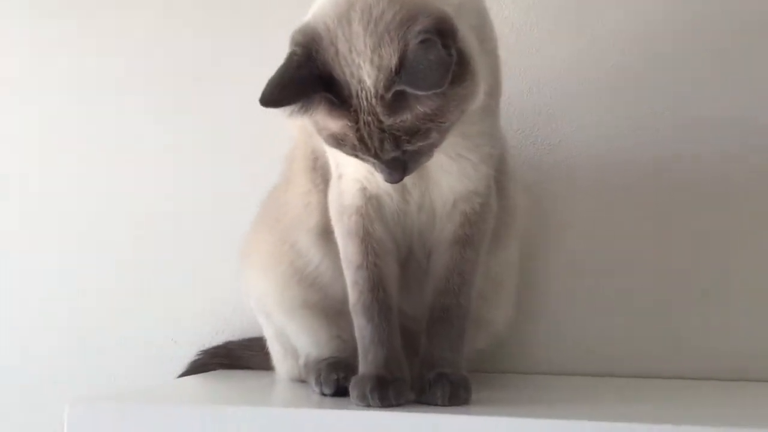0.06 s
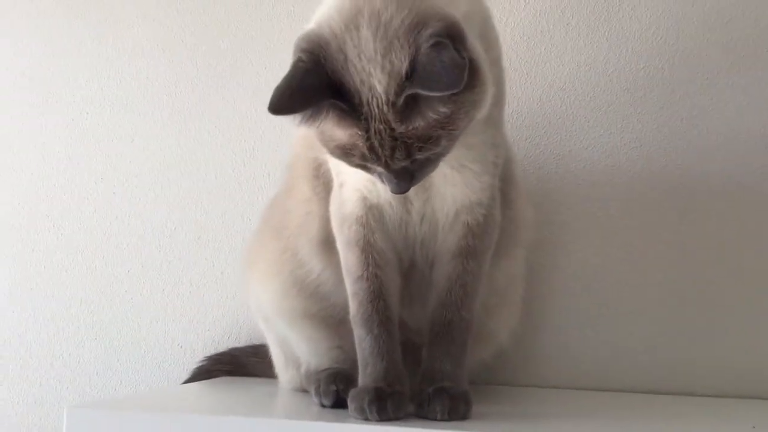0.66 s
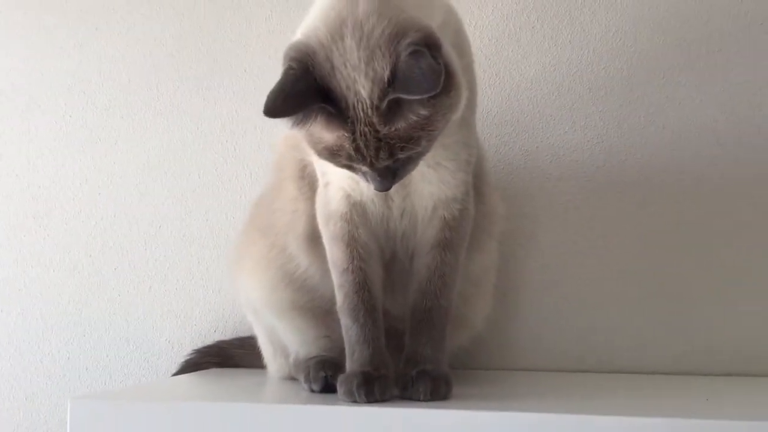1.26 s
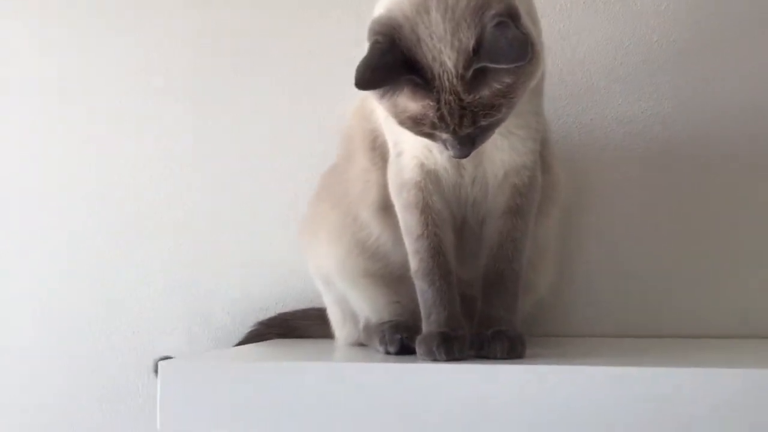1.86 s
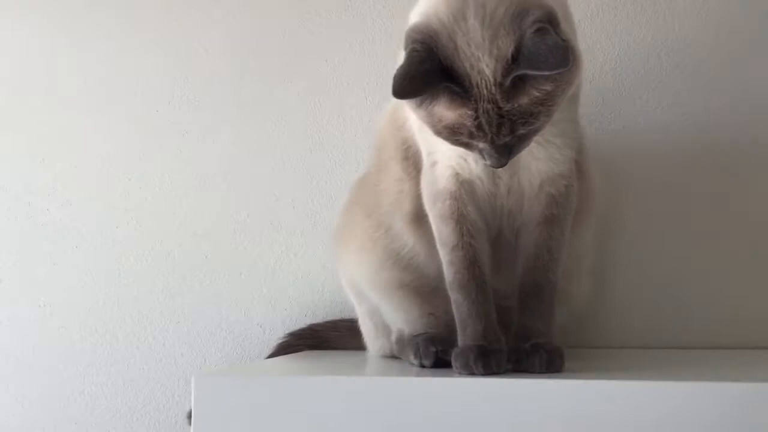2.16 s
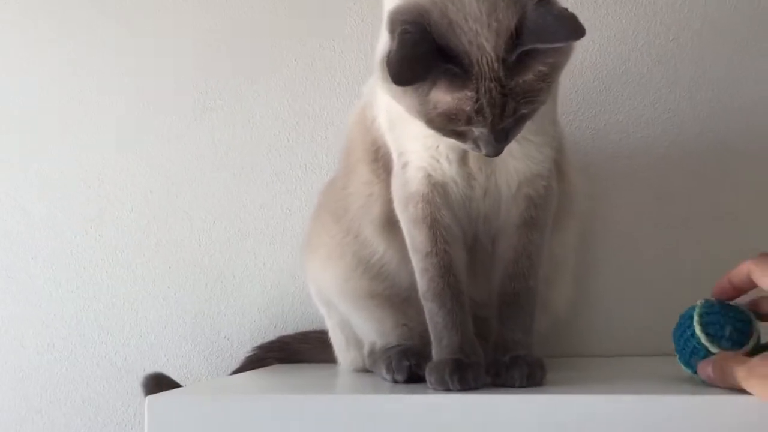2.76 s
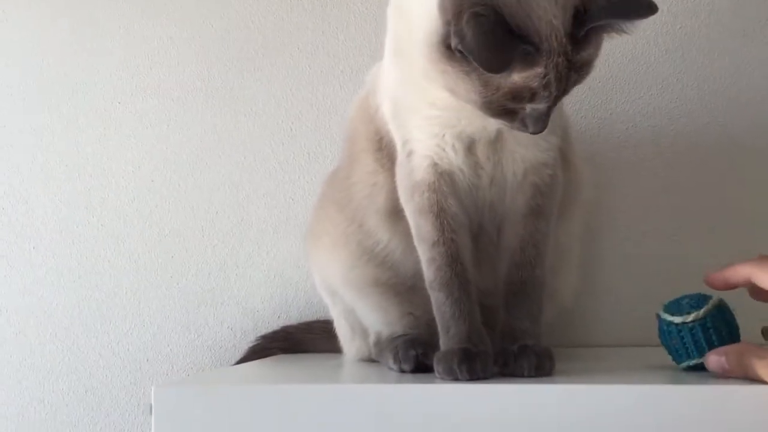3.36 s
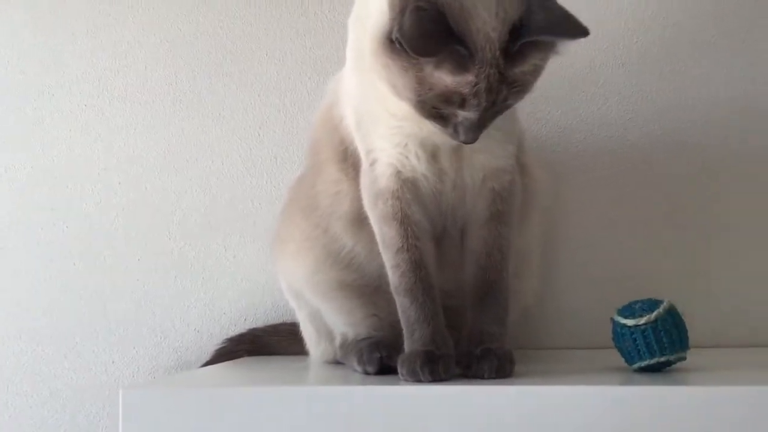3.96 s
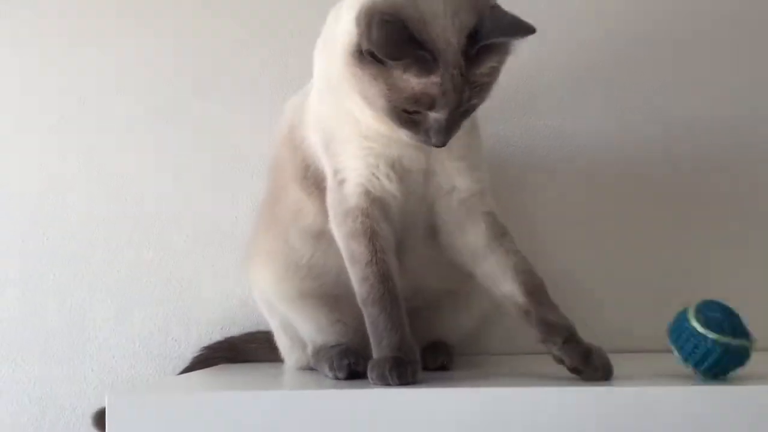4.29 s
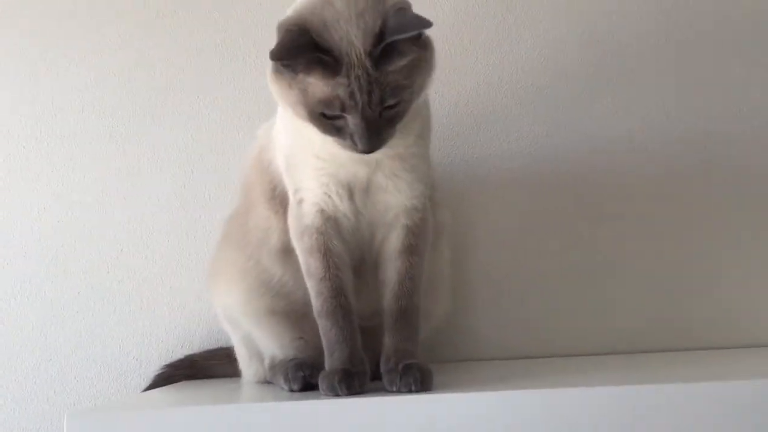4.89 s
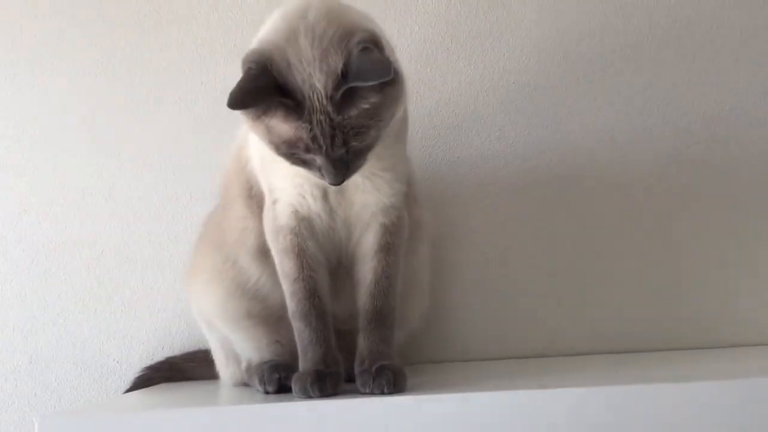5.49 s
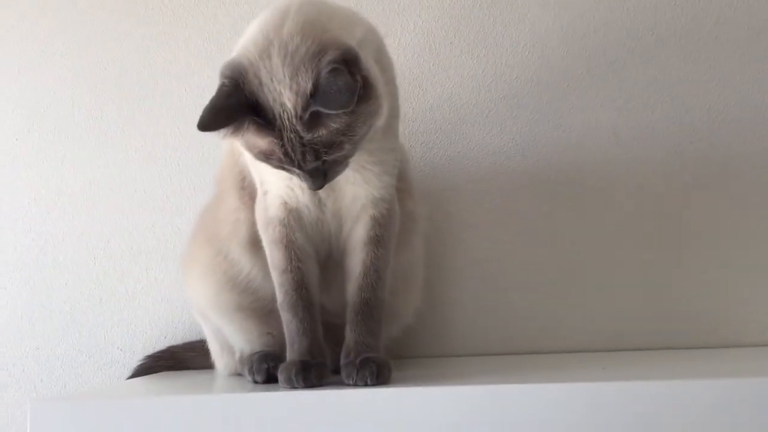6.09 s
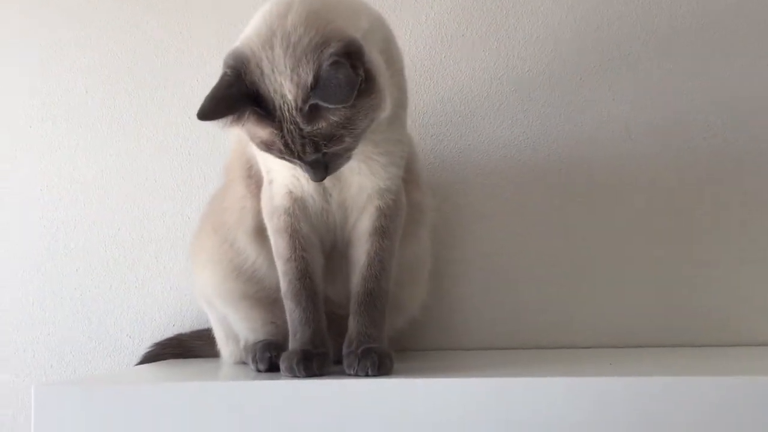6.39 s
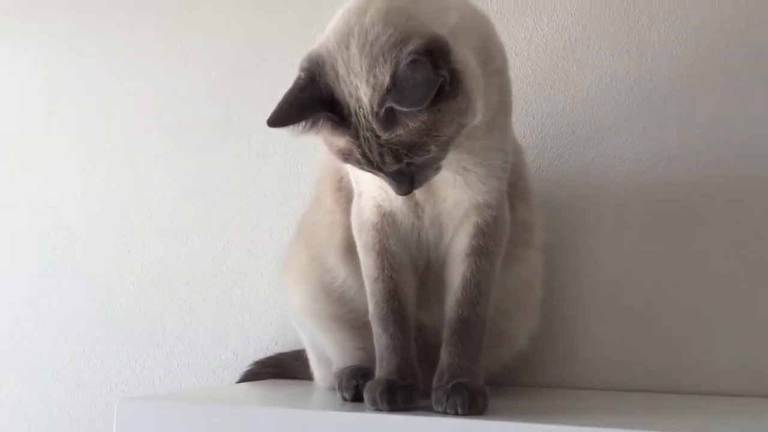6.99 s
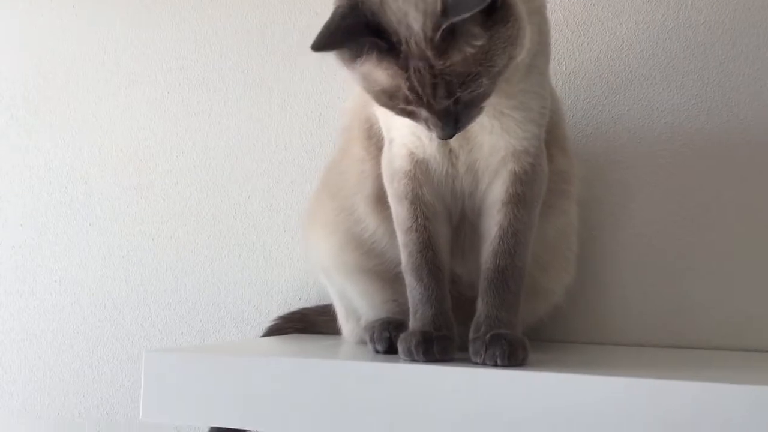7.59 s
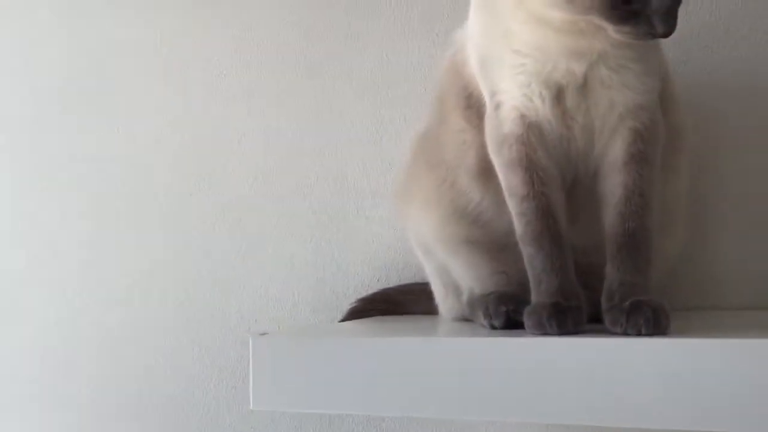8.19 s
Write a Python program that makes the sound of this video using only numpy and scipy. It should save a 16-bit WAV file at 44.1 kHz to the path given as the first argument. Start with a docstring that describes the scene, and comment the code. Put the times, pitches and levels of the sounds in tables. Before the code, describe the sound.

A plastic toy clacks and jingles in a bare room; later a ball is brushed off a shelf, bounces and knocks against furniture.

```python
"""A hollow plastic toy clatters in a bare room and rolls away, a pellet jingling the steel bell inside it.
A tiny bell tinkles faintly and small handling ticks sound close by. A cat's paw sweeps a yarn-covered
ball off a shelf, its fibres crackling. The ball slaps the hard floor, bounces in dull thuds, knocks against
furniture with a dry rattle and rolls out. The building murmurs underneath."""
import sys
import numpy as np
from scipy import signal
from scipy.fft import rfft, irfft, next_fast_len
from scipy.io import wavfile

SR = 44100
rng = np.random.default_rng(int(sys.argv[2]) if len(sys.argv) > 2 else 0)


def int16_out(signal):
    """Quantize to a 16-bit WAV file."""
    q = np.round(np.clip(np.atleast_2d(signal).T, -1, 1) * 32767)
    wavfile.write(sys.argv[1], SR, q.astype(np.int16))


N = 363825
CLOCK = np.arange(N) / SR  # time in the scene [s]
T = np.arange(SR) / SR  # time after a hit [s]
TOY_START_S, TOY_STOP_S, TOY_RISE_S = 0.2, 1.15, 0.058  # the roll of the toy and its bell

# crisp colour of yarn, ticks and tinkle attacks: (frequency [Hz], level [dB])
CRISP_COLOUR = [(500, -30), (1700, -17), (2400, -6.5), (4800, -5.5), (7500, 5), (10000, -0.5), (15000, -7)]


def plastic_toy():
    """The hollow shell gives short, hard clacks, thumps onto its side and trundles away."""
    # hits on the shell: (time [s], level [dB])
    clacks = [(0.1255, -18.5), (0.2145, -12), (0.22, -26)]
    # shell modes: (frequency [Hz], level [dB], t60 [s])
    shell_modes = [(993.5, -8, 0.084), (1220, -3.5, 0.075), (1376, 0.5, 0.067), (1470, -2, 0.017),
                   (1691.5, -0.5, .08), (1966, -3.5, 0.11), (2180, -8.5, .1), (2343, -11, 0.11)]
    # drops onto its side: (time [s], level [dB])
    thumps = [(0.166, -23), (0.278, -42.5)]
    # colours of the clack, the thump and the rolling shell: (frequency [Hz], level [dB])
    clack_colour = [(200, -32), (850, -15), (1300, -1.5), (2150, 0.5), (2750, -26.5), (6000, -37),
                    (15000, -49)]
    thump_colour = [(70, -37.5), (120, -15), (175, 1), (270, -4), (500, -4.5), (1000, -7), (3000, -17.5),
                    (8000, -31.5)]
    trundle_colour = [(90, -30), (240, -10.5), (355, -1), (450, -13), (620, -5.5), (1000, -10.5),
                      (1900, -12), (2800, -29.5), (6000, -44)]
    out = np.zeros(N)
    for s, db in clacks:
        shell = amp(-2) * ring(shell_modes, vary_db=1, blur_hz=30)
        contact = amp(5) * burst(clack_colour, t60=0.03)
        add(out, s, amp(db) * in_room(shell + contact, wet_db=-4.5))
    for s, db in thumps:
        thump = burst(thump_colour, t60=0.13, rise=0.0016)
        add(out, s, amp(db) * in_room(thump, wet_db=-6))
    out = low_cut(out, hz=130, order=3)  # the small shell radiates little bass
    speed = rolling_speed(TOY_START_S, TOY_STOP_S, TOY_RISE_S)
    return out + amp(-46) * speed * coloured(grains(N, spread_db=3.5), trundle_colour)


def jingle_bell():
    """A loose pellet strikes the slotted steel shell; its rolling keeps the ring going and roughens it."""
    # pellet hits: (time [s], level [dB], trim of the lowest mode [dB])
    jingles = [(0.0, -46.5, 6), (0.1256, -26, -16), (0.143, -24, -11), (0.165, -24, -18),
               (0.183, -21.5, 3.5), (0.2, -29, 13), (0.2264, -23, 6.5), (0.2624, -27, 13.5),
               (0.3961, -34.5, -9), (0.4863, -32.5, 0), (0.512, -36, 9), (0.6109, -37.5, 13.5),
               (0.7637, -33.5, -17.5), (0.808, -39.5, -3), (0.9353, -44, -7), (1.0219, -49.5, -19),
               (1.341, -63, 4.5), (1.712, -62, 3)]
    # bell modes: (frequency [Hz], level [dB], t60 [s])
    bell_modes = [(4995, -1, 0.16), (5610, 1.5, .58), (6005, -5.5, 0.8), (6580, -14, 0.94),
                  (7250, -14.5, 0.3802), (7790, -11, .9), (9060, -14, .4), (11230, -4, 0.08),
                  (11580, -16.5, .4), (12900, -14.5, 0.22), (14800, -12.5, .18)]
    # colour of the pellet on steel: (frequency [Hz], level [dB])
    steel_colour = [(800, -29), (3600, -13), (5200, 0), (6100, 5), (6850, -2.5), (7400, -0.5), (9200, -2),
                    (10200, -12), (11200, -0.5), (12000, -1.5), (15000, -3.5)]
    out = np.zeros(N)
    motion = amp(-41) * rolling_speed(TOY_START_S, TOY_STOP_S, TOY_RISE_S) ** 1.4
    damping = amp(-9.5) + amp(-2.5) * fade(0.045)  # the pellet lies on the shell and chokes most of the ring
    for s, db, low_db in jingles:
        lowest = amp(low_db - 4) * ring(bell_modes[:1], vary_db=0, blur_hz=30)
        upper = ring(bell_modes[1:], vary_db=1, blur_hz=22)
        click = amp(1.5) * burst(steel_colour, t60=0.022, rise=0.0002)
        add(out, s, amp(db) * in_room(damping * (lowest + upper) + click, wet_db=-9))
        add(motion, s, amp(db - 10.5) * fade(0.22))  # the pellet skitters on after each hit
    rolling = coloured(grains(N, spread_db=4), steel_colour)
    singing = unit(signal.fftconvolve(rolling, ring(bell_modes, vary_db=0, blur_hz=20))[:N])
    return out + in_room(motion * (amp(-0.5) * rolling + amp(-6) * singing), wet_db=-8)


def ball_bounces():
    """A hard landing slaps; softer ones mostly thud and set the floor booming."""
    # landings: (time [s], thud [dB], slap [dB], boom [dB])
    landings = [(5.0938, -13.5, -12.5, -19.5), (5.5127, -15, -25.5, -24.5), (5.673, -20, -34.5, -24.5),
                (5.811, -34, -69, -33.5), (5.913, -35, -72, -31)]
    # modes of the squashing ball, and of the floor and room: (frequency [Hz], level [dB], t60 [s])
    squash_modes = [(155, -1.5, 0.11), (325.2, -2.5, 0.065)]
    boom_modes = [(182.2, 2.5, 0.38), (80.75, -10.5, 0.45), (63, -11, .5)]
    # colours of the dull thud and the sharp slap: (frequency [Hz], level [dB])
    thud_colour = [(25, -35), (60, -10.5), (110, -2), (160, 2.5), (320, -1.5), (420, -14), (700, -21.5),
                   (1500, -45), (4000, -80)]
    slap_colour = [(80, -28), (280, 0.5), (550, 4), (1000, -4), (1450, -7), (2200, -9), (3000, -17.5),
                   (5500, -17), (9000, -22), (15000, -30)]
    out = np.zeros(N)
    for s, thud_db, slap_db, boom_db in landings:
        squash = amp(-1.5) * ring(squash_modes, vary_db=0, rise=0.002)
        thud = amp(thud_db) * (squash + amp(-3.5) * burst(thud_colour, t60=0.27, rise=0.0027))
        slap = amp(slap_db) * burst(slap_colour, t60=0.22, spread_db=1, rise=0.00087)
        boom = amp(boom_db) * ring(boom_modes, vary_db=1, rise=0.01)
        add(out, s, in_room(thud, wet_db=-6) + in_room(slap, wet_db=-4) + boom)
    return out


def furniture_bumps():
    """The ball knocks on wood, and its filling rattles."""
    # bumps: (time [s], knock [dB], rattle [dB])
    bumps = [(5.8134, -55, -47), (5.8286, -68, -44), (5.9134, -59, -47), (6.1429, -48, -45),
             (6.176, -59, -43), (6.296, -23.5, -29), (6.341, -30, -37), (6.4079, -43.5, -41),
             (6.514, -43, -39), (6.562, -44, -42), (6.743, -70.5, -54)]
    # furniture modes: (frequency [Hz], level [dB], t60 [s])
    wood_modes = [(261.7, 2, 0.22), (358.4, 2, 0.38), (442, -7, 0.1), (548, -20, .12), (656, 2, 0.039)]
    # colours of the woody knock and the dry rattle: (frequency [Hz], level [dB])
    knock_colour = [(50, -11), (150, 0), (350, 5.5), (520, -3), (700, -7), (1050, -16), (2000, -41),
                    (5000, -39)]
    rattle_colour = [(300, -43), (1500, -12.5), (3000, -9.5), (4500, -1.5), (7000, -1), (10500, -8),
                     (15000, -10.5)]
    out = np.zeros(N)
    for s, knock_db, rattle_db in bumps:
        wood = amp(-7.5) * ring(wood_modes, vary_db=1, rise=0.002, blur_hz=30)
        knock = amp(knock_db) * (wood + burst(knock_colour, t60=0.13))
        rattle = amp(rattle_db) * burst(rattle_colour, t60=0.16, spread_db=2)
        add(out, s, in_room(knock + rattle, wet_db=-4.5))
    return out


def handling_ticks():
    """Tiny contacts close by, each a very short, bright snap of noise."""
    # ticks: (time [s], relative level [dB])
    ticks = [(2.1442, -38), (2.273, -44.5), (2.311, -42), (2.3469, -41.5), (2.4364, -38), (3.349, -54),
             (3.378, -53), (4.3162, -31), (4.447, -35), (4.5178, -35.5), (4.582, -39), (4.6072, -37),
             (4.765, -45), (7.8455, -35.5)]
    out = np.zeros(N)
    for s, db in ticks:
        add(out, s, amp(db - 3) * burst(CRISP_COLOUR, t60=0.011, rise=0.0001))
    return out


def paw_sweep():
    """The paw brushes the ball along the shelf in one grainy swish."""
    # colour of the brushing: (frequency [Hz], level [dB])
    brush_colour = [(290, -67), (500, -36.5), (1040, -14.5), (1170, -9), (1700, -0.5), (2650, -3.5),
                    (2930, -1), (3190, -6), (3630, -6), (11300, -14.5), (15500, -23.5)]
    return amp(-45) * paw_push() * coloured(grains(N, spread_db=2.5), brush_colour)


def tiny_bell():
    """Faint, pure tinkles: two close modes beat against each other after a crisp attack."""
    # strikes: (time [s], level [dB])
    tinkles = [(1.675, -65.5), (1.712, -57.5), (1.756, -55), (1.80, -58.5), (2.0, -70), (2.74, -72),
               (2.834, -64), (4.0, -69.5), (4.132, -66)]
    # bell modes: (frequency [Hz], level [dB], t60 [s])
    bell_modes = [(7840, -6, 0.23), (7780, 2, 0.2), (15090, -27, .15)]
    out = np.zeros(N)
    for s, db in tinkles:
        tone = ring(bell_modes, vary_db=1, rise=0.002)
        add(out, s, amp(db) * (tone + amp(-6) * burst(CRISP_COLOUR, t60=0.05)))
    return in_room(out, wet_db=-10)


def furniture_taps():
    """Light taps on furniture, each with one short, blurred ring."""
    # taps: (time [s], level [dB], ring frequency [Hz])
    taps = [(0.06, -62, 2319), (2.345, -71, 2920), (4.765, -55.5, 2751), (7.283, -51.5, 1300),
            (7.333, -57, 1257), (7.395, -60, 1300)]
    # colour of the contact: (frequency [Hz], level [dB])
    tap_colour = [(120, -7), (300, 2), (520, -7.5), (850, -14.5), (1400, -2.5), (2000, -4), (3000, -1.5),
                  (4500, -5), (6000, -13.5), (14000, -30)]
    out = np.zeros(N)
    for s, db, hz in taps:
        body = amp(1.5) * ring([(hz, 0, 0.13)], vary_db=0, rise=0.0031, blur_hz=160)
        add(out, s, amp(db) * (burst(tap_colour, t60=0.1716, rise=0.003) + body))
    return out


def yarn_crackle():
    """Fibres snap under the paw, in each rustle and wherever the ball rolls."""
    # rustles from handling and scuffing: (centre time [s], level [dB], length [s])
    rustles = [(1.31, -72, 0.34), (2.148, -63.5, .08), (2.34, -63.5, 0.16), (3.285, -74, 0.31),
               (5.95, -49.5, 0.099), (7.414, -65.5, 0.071), (7.855, -56.5, 0.11)]
    floor_speed = rolling_speed(start=6.3, stop=7.78, rise=0.046)  # after the last hard knock
    motion = amp(-57) * paw_push() + amp(-61.5) * shelf_roll() + amp(-57.5) * floor_speed ** 2.07
    for s, db, length in rustles:
        motion += amp(db) * np.exp(-(2 * (CLOCK - s) / length) ** 2)
    crackle = unit(snaps(per_s=330, spread_db=7.5))
    hiss = amp(-2) * rng.standard_normal(N)
    return motion * coloured(crackle + hiss, CRISP_COLOUR)


def shelf_rumble():
    """The shelf board rumbles softly when nudged and under the rolling ball."""
    # nudges: (time [s], level [dB])
    nudges = [(1.69, -63.5), (2.475, -67.5)]
    # colour of the board: (frequency [Hz], level [dB])
    board_colour = [(40, -19.5), (105, 5), (180, -11.5), (350, -7), (600, -23), (1500, -39.5)]
    nudging = sum(amp(db) * stroke(s, attack=0.017, hold=0.031, t60=0.3) for s, db in nudges)
    return (nudging + amp(-63) * shelf_roll()) * coloured(rng.standard_normal(N), board_colour)


def room_tone():
    """The low, steady murmur of the building under a faint hiss."""
    # colour of the air: (frequency [Hz], level [dB])
    air_colour = [(12, -46.5), (20, -12.5), (44, -2.5), (101, -0.5), (126, -9), (266, -9), (519, -21),
                  (565, -17.5), (788, -20.5), (1200, -18.5), (2330, -24), (7310, -30), (7950, -28.5),
                  (15500, -39.5)]
    return amp(-68) * coloured(rng.standard_normal(N), air_colour)


def in_room(x, wet_db):
    """Add the reverb of the bare walls, with a fresh tail for every place."""
    # room decay: (frequency [Hz], t60 [s])
    decay_times = [(60, .7), (180, 0.68), (380, 0.76), (1000, .9), (2000, 1), (5000, 0.97), (9000, 0.72),
                   (15000, 0.38)]
    hz, t, noise = signal.stft(rng.standard_normal(SR), SR, nperseg=256)
    decaying = noise * fade(along(decay_times, hz)[:, None], t)
    tail = signal.istft(decaying, SR)[1][:SR] * onset(0.0032)
    return x + amp(wet_db) * signal.fftconvolve(x, tail / np.linalg.norm(tail))[:len(x)]


def paw_push():
    """How hard the paw presses on the ball, 0-1."""
    return stroke(start=4.21, attack=0.052, hold=0.075, t60=0.64)


def shelf_roll():
    """How strongly the ball rolls on the shelf, 0-1: even up to the edge, then dying away."""
    return stroke(start=4.41, attack=0.05, hold=0.16, t60=0.3)


def rolling_speed(start, stop, rise):
    """Speed, 0-1, of a thing that gets rolling and is evenly slowed by friction."""
    return np.clip((CLOCK - start) / rise, 0, 1) * np.clip((stop - CLOCK) / (stop - start), 0, 1)


def stroke(start, attack, hold, t60):
    """An envelope that swells, holds and dies away; times in seconds."""
    t = CLOCK - start
    return np.clip(t / attack, 0, 1) ** 2 * fade(t60, np.maximum(t - attack - hold, 0))


def ring(modes, vary_db, rise=0.0002, blur_hz=0):
    """Damped modes, their strengths scattered by vary_db; a drifting phase widens each by blur_hz."""
    hz, db, t60 = np.transpose(modes)[:, :, None]
    gain = amp(db + vary_db * rng.standard_normal(db.shape))
    steps = rng.standard_normal((len(hz), SR), dtype=np.float32)
    drift = np.cumsum(steps, axis=1) * np.sqrt(2 * np.pi * blur_hz / SR)
    waves = np.sin(2 * np.pi * hz * T + drift) * fade(t60)
    return np.sum(gain * waves, axis=0) / np.linalg.norm(gain) * np.sqrt(2) * onset(rise)


def burst(spectrum, t60, spread_db=0, rise=0.00037):
    """The dying noise of one contact."""
    return coloured(grains(SR, spread_db), spectrum) * fade(t60) * onset(rise)


def grains(count, spread_db):
    """White noise made of tiny contacts whose sizes scatter by spread_db."""
    grain_samples = 32
    sizes = amp(spread_db * np.clip(rng.standard_normal(count // grain_samples + 1), -2.5, 2.5))
    return unit(rng.standard_normal(count) * np.repeat(sizes, grain_samples)[:count])


def snaps(per_s, spread_db):
    """Separate tiny clicks at random moments."""
    fires = rng.random(N) < per_s / SR
    sizes = amp(spread_db * np.clip(rng.standard_normal(N), -2, 2))
    return fires * sizes * rng.choice([-1, 1], N)


def coloured(x, spectrum):
    """Shape x with an EQ curve, at rms 1."""
    gain = amp(along(spectrum, np.fft.rfftfreq(len(x), 1 / SR)))
    return unit(irfft(rfft(x) * gain, len(x)))


def low_cut(x, hz, order):
    """Roll off the bass below hz."""
    return signal.sosfilt(signal.butter(order, hz, "highpass", fs=SR, output="sos"), x)


def along(points, hz):
    """Read (frequency [Hz], value) points on a log axis."""
    frequencies, values = np.transpose(points)
    return np.interp(np.log(hz + 1), np.log(frequencies), values)


def onset(rise):
    """Attack with a time constant of rise seconds."""
    return 1 - np.exp(-T / rise)


def fade(t60, t=T):
    """Decay by 60 dB every t60 seconds."""
    return np.exp(-np.log(1000) * t / t60)


def add(track, s, sound):
    """Mix a sound into the track at time s."""
    part = track[max(round(s * SR), 0):][:len(sound)]
    part += sound[:len(part)]


def amp(db):
    """Decibels to gain."""
    return 10 ** (np.asarray(db) / 20)


def unit(x):
    """Scale to rms 1."""
    return x / np.sqrt(np.mean(x ** 2) + 1e-20)


def scene():
    """Everything as heard from beside the shelf; such small things radiate no deep bass."""
    props = plastic_toy() + jingle_bell() + tiny_bell() + ball_bounces() + furniture_bumps()
    close = yarn_crackle() + shelf_rumble() + handling_ticks() + furniture_taps()
    sweep = paw_sweep()
    props += in_room(close, wet_db=-11.5) + in_room(sweep, wet_db=-9.5)
    return (low_cut(props, hz=46, order=4) + room_tone())[None]


def record(dry):
    """A steep high cut takes off the very top of the treble."""
    top_hz = 15350
    size = next_fast_len(N + SR)
    hz = np.fft.rfftfreq(size, 1 / SR)
    return irfft(rfft(dry, size) / np.sqrt(1 + (hz / top_hz) ** 240), size)[:, :N]


dry = scene()
out = record(dry)
int16_out(out)
```